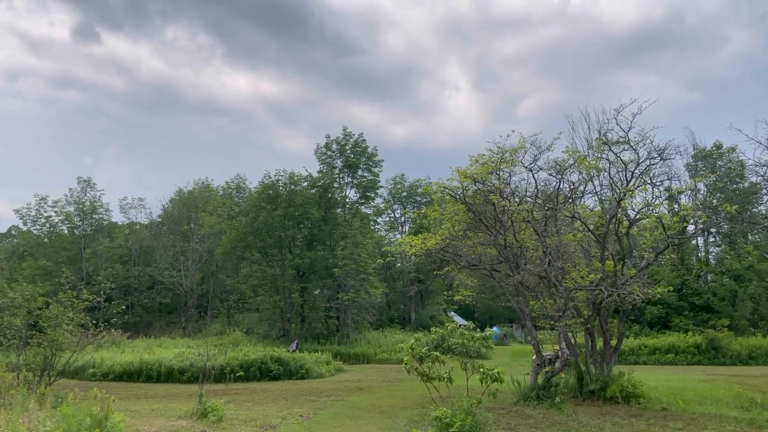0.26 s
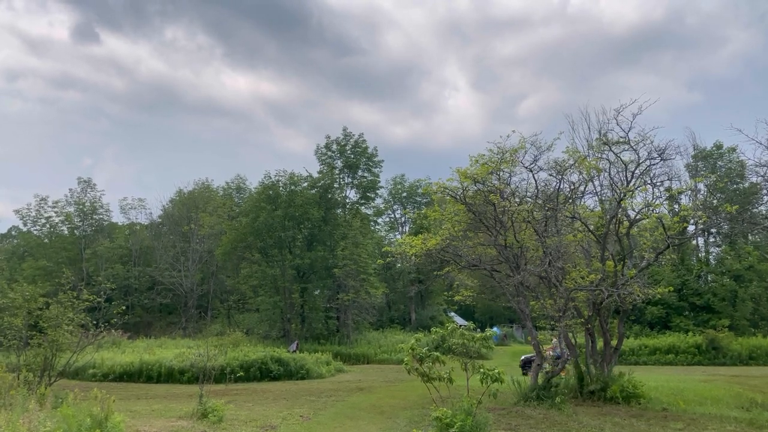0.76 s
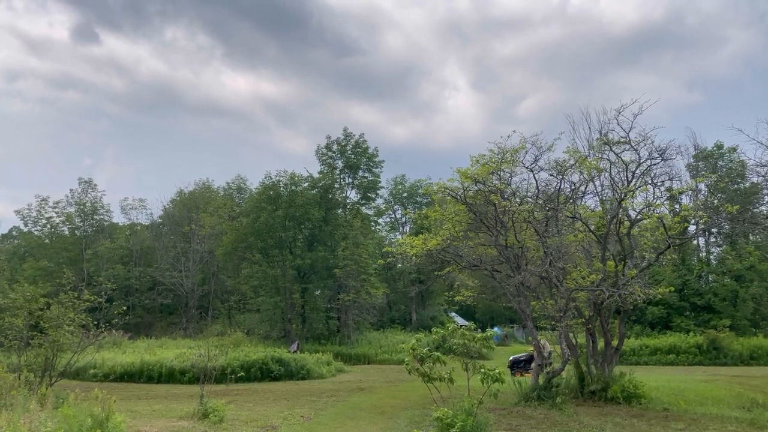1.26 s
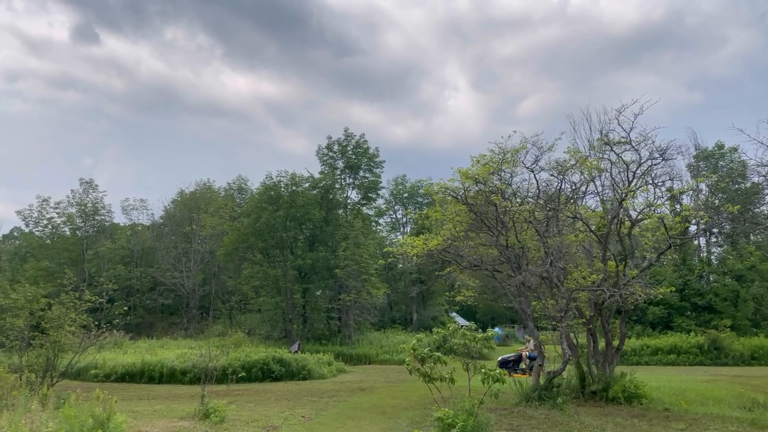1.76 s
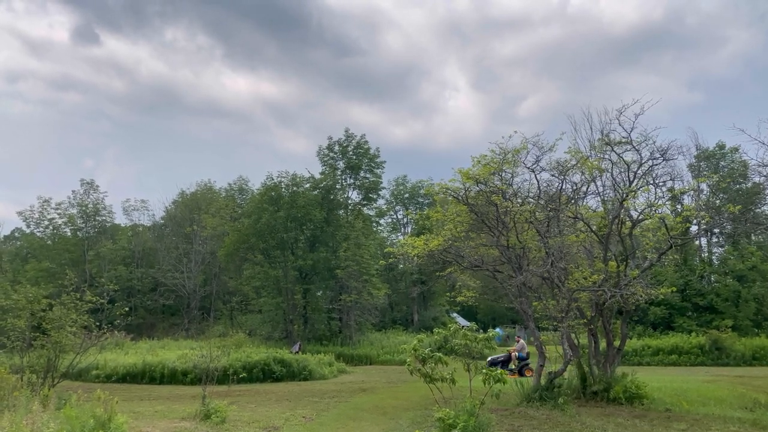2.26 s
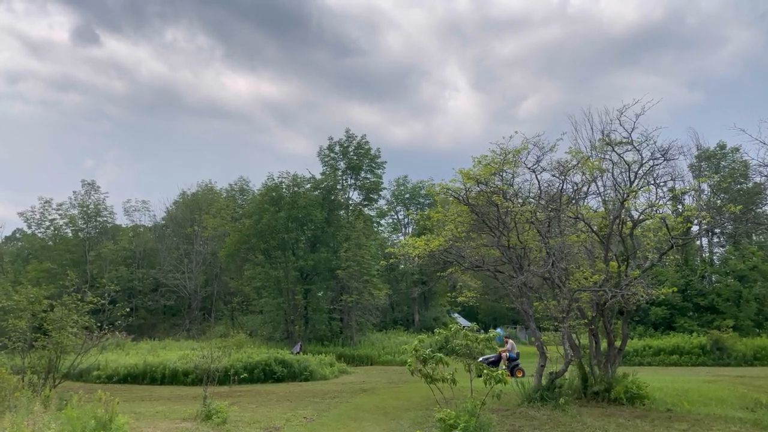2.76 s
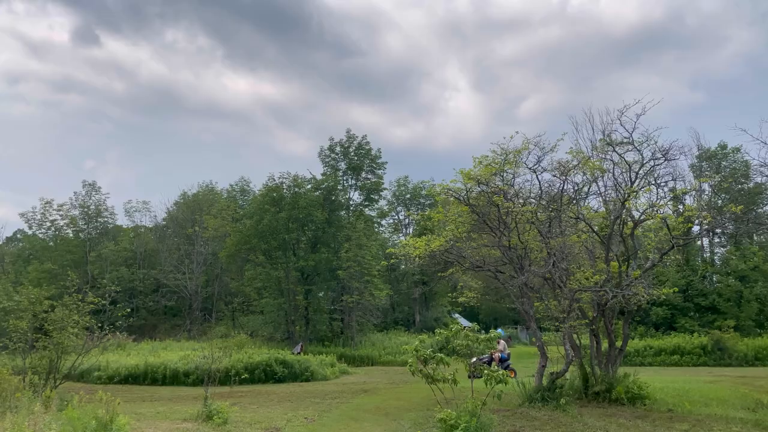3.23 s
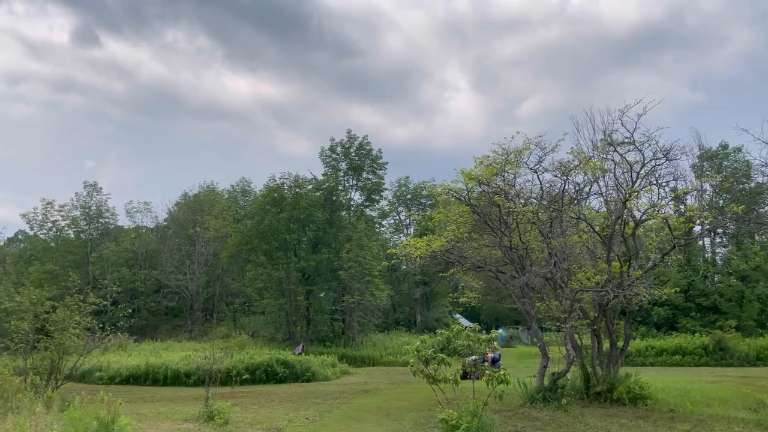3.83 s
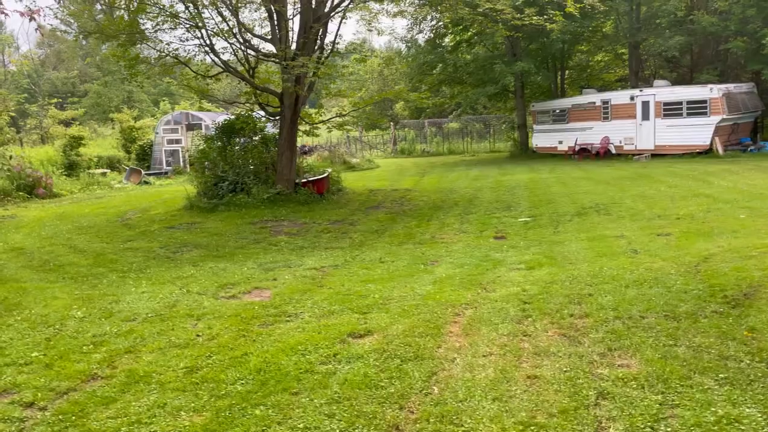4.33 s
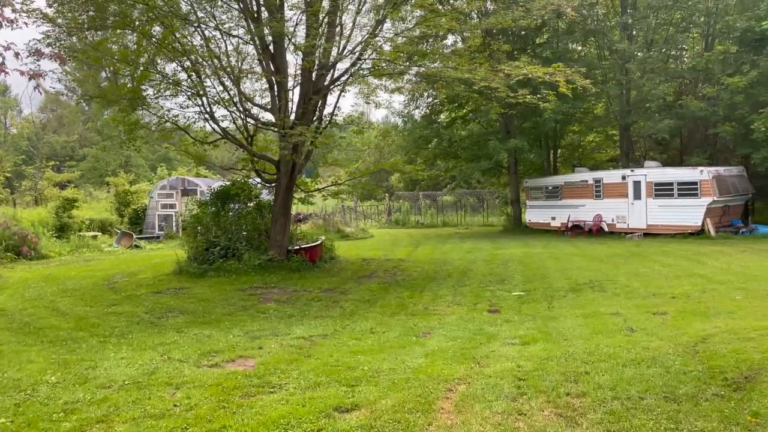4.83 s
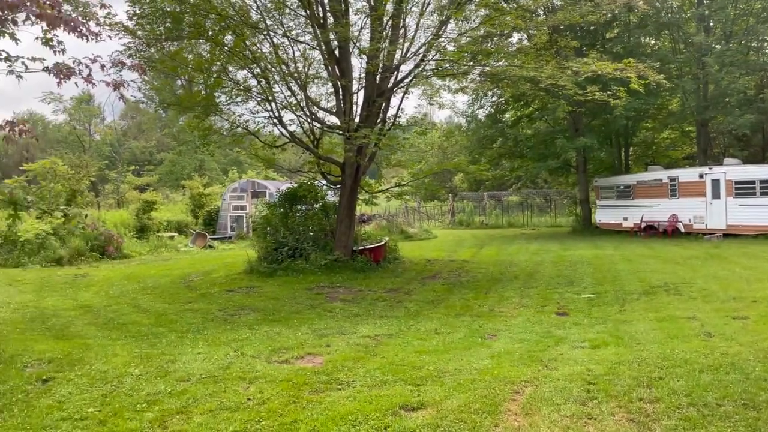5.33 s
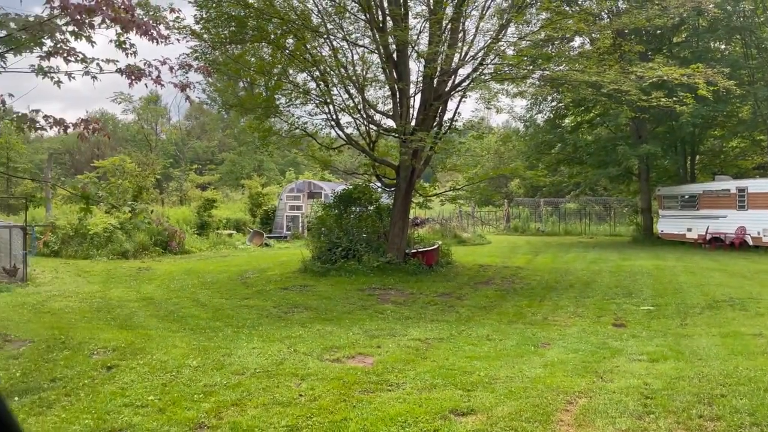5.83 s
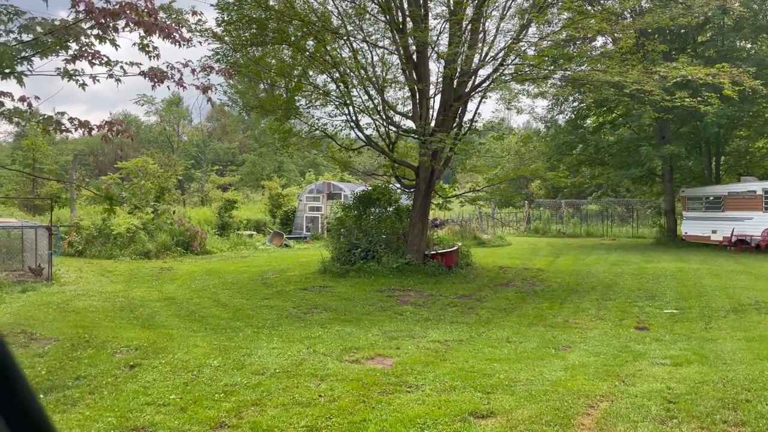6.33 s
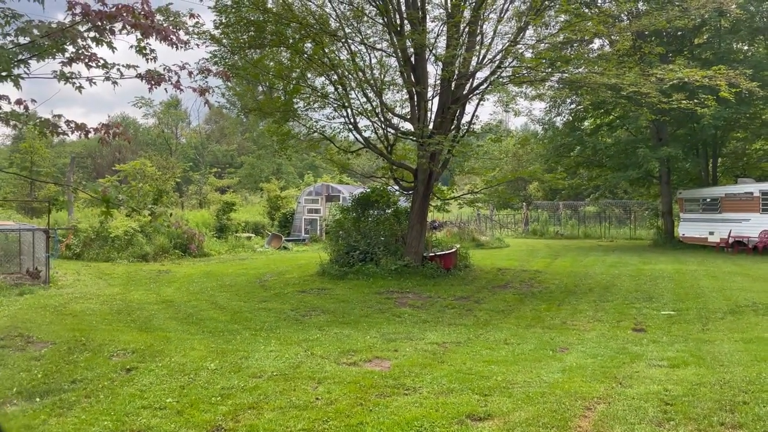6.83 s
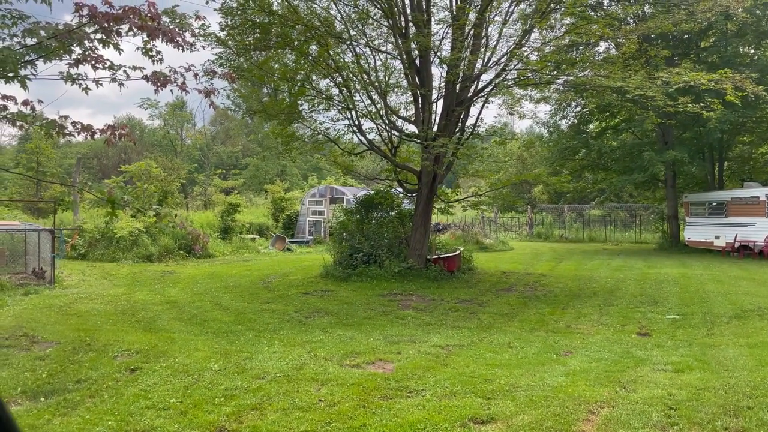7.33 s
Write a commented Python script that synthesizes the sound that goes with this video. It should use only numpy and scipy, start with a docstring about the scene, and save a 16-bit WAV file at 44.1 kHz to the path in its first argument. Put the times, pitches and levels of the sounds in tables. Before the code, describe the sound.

A mower's constant buzzing drone fills an open lawn, gradually clearer and brighter as it approaches, with brief crackles of struck debris. A hard cut leaves a much quieter yard, with only a muffled, throbbing low engine behind trees and faint open air. Quick high birdsong comes first with soft knocks and scuffs near the stereo microphone, then a lull, then thin chirps and a few faint ticks.

```python
"""A far lawn, then a sheltered yard: a riding mower approaches, and at 4.288 s the scene jumps to the yard.
Lawn: harmonics make the exhaust drone and blade hum, shaped noise the deck roar and struck twigs,
gliding narrow noise bands the whirring steel, ringing grit the pings.
Yard: low harmonics and noise make the mower's rumble, noise the open air, gliding whistles with tree echoes
the birds, short pulses and noise the soft taps, scuffs and ticks close by."""
import sys
import numpy as np
from scipy import signal
from scipy.fft import rfft, irfft
from scipy.io import wavfile

SR = 44100
rng = np.random.default_rng(int(sys.argv[2]) if len(sys.argv) > 2 else 0)


def dump(signal):
    """Clip the signal to [-1, 1] and save it as 16-bit WAV at the path in sys.argv[1]."""
    limited = np.clip(np.atleast_2d(signal).T, -1, 1)
    pcm = np.round(limited * 32767).astype(np.int16)
    wavfile.write(sys.argv[1], SR, pcm)


N = 334719
T, HZ = np.arange(N) / SR, np.fft.rfftfreq(N, 1 / SR)

# engine speed: t/s, rate/(four-stroke cycles/s)
SPEED = [(0, 25.5), (2.0, 25.5), (2.8, 25.42), (3.6, 25.22), (4.3, 25.25), (5.2, 25.6), (6.5, 25.72),
         (7.6, 25.5)]
# exhaust harmonics: multiple of the cycle rate, lawn level/dB, yard level/dB
EXHAUST = [(2, -35, -36.5), (3, -50, -59), (4, -40, -49), (5, -28.5, -40.5), (6, -34.5, -38.5),
           (7, -51, -52), (8, -41.5, -50.5), (9, -44.5, -66.5), (10, -43.5, -63.5), (12, -53, -90),
           (13, -48, -78), (14, -49.5, -75), (16, -61.5, -85)]
# likeness of the two microphone ports on the lawn: f/Hz, likeness 0-1
LAWN_LIKENESS = [(200, .99), (450, .95), (1000, .88), (2200, .66), (4200, .84), (5400, .62), (6200, .82),
                 (6900, .6), (7700, .96), (8700, .99), (9500, .88), (11000, .78), (13200, .99)]
# port balance on the lawn: f/Hz, left minus right/dB
LAWN_BALANCE = [(100, 7), (500, 2.5), (1500, 3), (2400, -0.5), (3300, 4.5), (4500, 0.5), (5500, -3),
                (7000, 0)]
# likeness of the ports in the yard: f/Hz, likeness 0-1
YARD_LIKENESS = [(200, 0.72), (500, 0.12), (1500, 0.073), (3000, 0.36), (7000, 0.15), (9000, 1),
                 (11200, 0.59), (12800, .99)]
# port balance in the yard: f/Hz, left minus right/dB
YARD_BALANCE = [(100, -8), (250, 3.5), (500, 2), (1200, 7), (2000, 3), (6500, 5), (8000, -0.5)]


def gain_of(db):
    """Decibels to amplitude."""
    return 10 ** (np.asarray(db) / 20)


def evened(x):
    """Scaled to rms 1."""
    return x / np.sqrt(np.mean(x ** 2) + 1e-20)


def over_time(rows):
    """Each column of a curve table at every sample."""
    s, *columns = np.transpose(rows)
    return [np.interp(T, s, c) for c in columns]


def over_hz(points):
    """A short spectrum at every frequency, interpolated over log f."""
    f, value = np.transpose(points)
    return np.interp(np.log(HZ + 1), np.log(f + 1), value)


def shaped(x, gain):
    """Filters by a gain at every frequency."""
    return irfft(rfft(x) * gain, N)


def add(mix, s, sound):
    """Lays a sound into the mix at a time in s."""
    part = mix[round(s * SR):][:len(sound)]
    part += sound[:len(part)]


def drift(rate_hz):
    """Gaussian-spectrum random motion of rms 1, mostly below rate_hz."""
    hz = HZ[:len(HZ) // 10]
    real, imaginary = rng.standard_normal((2, len(hz)))
    return evened(irfft((real + 1j * imaginary) * np.exp(-(hz / rate_hz) ** 2) * (hz > 0), N))


def swells(rows, width_s):
    """Smooth passing changes of level, in dB."""
    return sum(db * np.exp(-((T - s) / width_s) ** 2) for s, db in rows)


def ports(direct, diffuse, likeness, balance):
    """Two ports hear one sound with a phase between them, the right also an unrelated share."""
    # f/Hz, left lead/rad
    port_phase = [(0, 0), (2300, 0), (2800, 1.4), (3400, -1.2), (3800, 0), (4900, .2), (5600, -2.0),
                  (6600, -.9), (7200, -2.95), (8700, -3.2), (9300, -3.4), (10000, -3.9), (11500, -4.9),
                  (13100, -6.28)]
    same = np.clip(over_hz(likeness), 0, 1)
    tilt = gain_of(over_hz(balance) / 2)
    shared = shaped(direct, same * np.exp(-1j * over_hz(port_phase)) / tilt)
    unrelated = shaped(diffuse, np.sqrt(1 - same ** 2) / tilt)
    return np.array([shaped(direct, tilt), shared + unrelated])


def turbulence(db, band_hz, likeness, balance, knock=0):
    """Stereo noise of a given spectrum, mid channel at rms 1 within a band; knock joins the noise."""
    direct, diffuse = rng.standard_normal((2, N))
    noise = shaped(np.array([evened(direct + knock), diffuse]), gain_of(db))
    x = ports(*noise, likeness, balance)
    return x / np.std(shaped(x.mean(0), (HZ > band_hz[0]) & (HZ < band_hz[1])))


def tone(turns, multiple, scatter, lag_rad=0):
    """One harmonic at rms 1, with a share that fades in and out through moving air and trees."""
    path = 1 + scatter * (drift(5.7) + 1j * drift(4.8))
    return evened((path * np.exp(1j * (2 * np.pi * multiple * turns - lag_rad))).imag)


def trees(x, t60_s, delay_s):
    """Trunks and leaves scatter a sound into a sparse decaying tail, different at each port."""
    t = T[:SR]
    sparse = rng.standard_normal((2, SR)) * (rng.random((2, SR)) < .05)
    tail = sparse * gain_of(-60 * t / t60_s) * (1 - np.exp(-t / delay_s))
    return signal.fftconvolve(x[None], tail / np.linalg.norm(tail[0]), axes=1)[:, :N]


def air(level_db=-60, swell_db=-0.2, leaves_db=1.5):
    """The faint noise wash of open air, with leaves stirring unevenly in the treble."""
    # f/Hz, density/dB
    air_spectrum = [(100, 16.5), (500, 1), (1000, 0.5), (2000, -2.5), (4000, -8.5), (6000, -15),
                    (8000, -17.5), (10000, -27), (14000, -25.5), (15500, -37)]
    wash = turbulence(over_hz(air_spectrum), (500, 3000), YARD_LIKENESS, YARD_BALANCE)
    leaves = shaped(wash, HZ ** 2 / (HZ ** 2 + 6000 ** 2))
    wash = wash + leaves * (gain_of(leaves_db * drift(32)) - 1)
    return wash * gain_of(level_db + swell_db * drift(7.2))


def far_calls(quaver=0.023, tree_db=7.5):
    """A distant bird's level whistles, heard only through scattering trees."""
    # t/s, length/s, f/Hz, level/dB ahead of the tree gain
    notes = [(6.06, 0.06, 1950, -64), (6.37, 0.04, 3000, -66), (6.78, 0.11, 2310, -66),
             (6.89, 0.08, 1950, -64), (7.168, 0.045, 1900, -62)]
    song, waver = np.zeros(N), 1 + quaver * drift(80)
    for s, length_s, hz, db in notes:
        size = round(length_s * SR)
        whistle = np.sin(2 * np.pi * np.cumsum(hz * waver[:size]) / SR)
        add(song, s, gain_of(db) * whistle * np.hanning(size))
    return gain_of(tree_db) * trees(song, t60_s=0.14, delay_s=0.003)


def twitter(start_s=4.8, end_s=5.6, low_hz=2700, high_hz=4400, level_db=-61, count=60):
    """A faint blurred twitter of random rising or falling slurs, heard only through the trees."""
    song, u = np.zeros(N), np.linspace(-.5, .5, SR // 30)
    for when, pitch, slur in rng.random((count, 3)):
        hz = (low_hz + pitch * (high_hz - low_hz)) * (1 + 0.354 * np.sign(slur - .5) * u)
        whistle = np.sin(2 * np.pi * np.cumsum(hz) / SR) * np.hanning(len(u))
        add(song, start_s + when * (end_s - start_s), gain_of(level_db) * whistle)
    return trees(song, t60_s=0.19, delay_s=0.0086) * gain_of([[2], [-2]])


def birds(direct_db=-4.0, near_db=2, far_db=-9, buzz=.045, quaver=0.0044):
    """Each syllable is a whistle gliding through its pitches, blurred by near branches and the far tree line."""
    # name: length/s, roughness 0-1, echo/dB, glide pitches/Hz
    repertoire = { "slur": (0.04, 0.1, -1.5, [4570, 4490, 4270, 3930, 3550]),
                  "rise": (0.04, 0.25, 0, [4200, 4700, 4950, 5150]),
                  "peak": (0.064, 0.12, -1, [3740, 3900, 4190, 4740, 5330, 4320, 3870, 3650]),
                  "hold": (0.044, 0.16, 0, [5120, 5290, 5240, 5180]),
                  "murmur": (0.07, 1, -1, [3500, 3720, 3850]),
                  "drop": (0.045, 1.0, 2, [3500, 3050, 2750, 2500]),
                  "buzz": (0.046, 0.9, -2, [6000, 6700, 7300]), "peep": (0.028, 0.1, -2, [1460, 1400]),
                  "pip": (0.055, 0.03, -4, [5330, 5220, 5130, 5060, 5100]),
                  "whistle": (0.05, 0.04, -7, [5260, 5170, 5170, 5130]),
                  "slide": (0.078, 0.26, 0, [7600, 6700, 6050, 6040]),
                  "chip": (0.026, 0.05, -5, [3560, 3600, 3540]),
                  "tsip": (0.042, 0.1, -9, [7440, 7460, 7230, 7450]),
                  "zip": (0.046, 0.9, -2, [7300, 7700, 8400]),
                  "arch": (0.115, 0.42, -1, [3600, 3950, 4330, 5450, 5650, 5150, 4850])}
    # warbled song, then thin high calls: t/s, syllable, level/dB
    phrases = [(4.368, "slur", -55), (4.425, "rise", -60), (4.452, "hold", -60), (4.513, "slur", -49),
               (4.606, "peak", -50), (4.652, "hold", -64), (4.674, "drop", -56), (4.671, "peep", -53),
               (4.762, "peep", -46), (4.81, "murmur", -58), (4.863, "slur", -50), (4.918, "rise", -53),
               (4.944, "hold", -55), (5.004, "slur", -47.5), (5.066, "buzz", -58), (5.091, "peak", -48.5),
               (5.135, "hold", -63), (5.175, "drop", -57.5), (5.295, "murmur", -58.5),
               (5.358, "slur", -52.5), (5.408, "rise", -55), (5.44, "hold", -58), (5.496, "slur", -52),
               (5.59, "peak", -54.5), (5.655, "drop", -58), (5.79, "zip", -65), (6.733, "whistle", -54),
               (6.818, "slide", -61), (6.978, "slur", -60), (7.03, "pip", -51.5), (7.106, "slide", -58.5),
               (7.258, "tsip", -56.5), (7.303, "chip", -57), (7.365, "arch", -54.5), (7.564, "tsip", -59)]
    song, thrown, flutter = np.zeros(N), np.zeros(N), drift(500)
    for s, name, db in phrases:
        length_s, rough, echo_db, pitches_hz = repertoire[name]
        u = np.linspace(0, 1, round(length_s * SR))
        hz = np.interp(u, np.linspace(0, 1, len(pitches_hz)), pitches_hz)
        hz = hz * (1 + (quaver + buzz * rough) * np.roll(flutter, -round(s * SR))[:len(u)])
        whistle = gain_of(db) * np.sin(2 * np.pi * np.cumsum(hz) / SR) * signal.windows.tukey(len(u), .7)
        add(song, s, whistle)
        add(thrown, s, gain_of(echo_db) * whistle)
    # twigs and leaves throw back the high notes best
    scattered = shaped(thrown, HZ ** 2 / (HZ ** 2 + 2000 ** 2))
    near = gain_of(near_db) * trees(scattered, t60_s=0.45, delay_s=0.0031)
    far = gain_of(far_db) * trees(scattered, t60_s=0.8, delay_s=.04)
    return (gain_of(direct_db) * song + near + far) * gain_of([[2.6], [-2.6]])


def taps(lag_cycles=1.5, level_db=-1, echo_db=-12, ring_hz=1560, ring_t60_s=0.032,
         snap_hz=1700, snap_delay_s=0.0006):
    """Sharp snap, dull push whose bass arrives last, a little ring and short echo; soft scuffs lie between."""
    # t/s, level/dB ahead of level_db, ring/dB and snap/dB against the push
    tap_rows = [(4.451, -40.5, -22, 2), (4.481, -48, -28, -12), (4.515, -42, -25, -14),
                (4.617, -42, -28, -18), (4.944, -41, 2.5, 0), (4.997, -43.5, -30, -16),
                (6.563, -56, -26, -12), (6.977, -46, -28, -18)]
    # t/s, length/s, level/dB
    scuff_rows = [(4.467, 0.045, -49.5), (4.563, 0.041, -53), (4.882, 0.07, -53)]
    # taps and scuffs: f/Hz, density/dB
    push_spectrum = [(60, -23), (200, 1), (400, 3.5), (750, -6), (1400, -11), (2500, -22), (6000, -42),
                     (12000, -58)]
    blows, scuffs, t = np.zeros(N), np.zeros(N), T[:SR // 20]
    colour = gain_of(over_hz(push_spectrum))
    push = irfft(colour * np.exp(-2j * np.pi * lag_cycles * np.log(HZ + 1)), N)[:len(t)]
    push = push / abs(push).max()
    ring = gain_of(-60 * t / ring_t60_s) * np.sin(2 * np.pi * ring_hz * t)
    u = 2 * np.pi * snap_hz * np.maximum(t - snap_delay_s, 0)
    snap = u * (2 - u) * np.exp(-u)
    snap = snap / snap.max()
    for s, db, ring_db, snap_db in tap_rows:
        blow = push + gain_of(ring_db) * ring + gain_of(snap_db) * snap
        add(blows, s, gain_of(db + level_db) * blow)
    for s, length_s, db in scuff_rows:
        add(scuffs, s, gain_of(db) * np.hanning(round(length_s * SR)))
    rubbing = scuffs * evened(shaped(rng.standard_normal(N), colour))
    return blows + rubbing + gain_of(echo_db) * trees(blows, t60_s=0.074, delay_s=0.0023)


def snaps(rows, level_db, rise_s, t60_s, crackle_db):
    """Short bright noise bursts whose level crackles irregularly."""
    # f/Hz, density/dB
    snap_spectrum = [(500, -27), (2000, -23), (4500, 2.5), (7000, 2.5), (9000, 2.5), (13000, 1),
                     (15500, -11)]
    strikes, t = np.zeros(N), T[:SR // 4]
    for s, db in rows:
        add(strikes, s, gain_of(db + level_db - 60 * t / t60_s) * (1 - np.exp(-t / rise_s)))
    splinters = evened(gain_of(crackle_db * drift(700)))
    noise = turbulence(over_hz(snap_spectrum), (7000, 15000), LAWN_LIKENESS, LAWN_BALANCE)
    return strikes * splinters * noise


def ticks():
    """Faint crisp ticks in the yard, as short noise bursts."""
    # t/s, level/dB ahead of level_db
    tick_rows = [(4.45, -57), (4.5126, -61), (5.0399, -61), (5.6543, -58), (6.0748, -57), (6.7198, -57),
                 (6.7752, -70), (6.9294, -60), (7.1718, -58)]
    return snaps(tick_rows, level_db=-10, rise_s=.001, t60_s=0.12, crackle_db=3.0)


def far_mower(cycles, right_lead_s=0.0005, octave_db=-50, throb_db=1.5, roar_db=-67, rumble_db=-51):
    """Mostly bass bends round into the yard, from the right, much of it scattered into a throbbing rumble."""
    # exhaust fades: t/s, multiples 2-3/dB, 4-5/dB, above/dB
    shelter = [(4.35, -6, 0, -10), (4.55, -8, -6, -13), (4.8, -7, -4, -10), (5.05, -14, -7, -4.5),
               (5.18, -2, -4, -5.5), (5.5, -2, -14, -3.5), (5.8, 0, -1, -5.5), (6.35, -1, -4, -2.5),
               (6.8, -1, 4, -3), (7.0, -1.5, 0.5, -3.5), (7.6, -2.5, -1.5, -2.5)]
    # blade hum throbs and dies away: t/s, level/dB ahead of a 2 dB cut
    yard_hum = [(4.3, -39), (4.52, -31), (4.62, -37), (4.73, -32), (4.85, -37.5), (4.95, -41),
                (5.03, -33.5), (5.16, -34), (5.42, -31.5), (5.56, -33), (5.7, -38), (5.92, -32),
                (6.08, -37.5), (6.19, -32.5), (6.45, -40), (7.0, -52)]
    # f/Hz, density/dB
    rumble_spectrum = [(20, -30), (32, -17), (50, -3), (80, -4.5), (108, 2), (150, -2.5), (200, -10.5),
                       (280, -14.5), (350, -23.5), (450, -33), (800, -74)]
    # rumble swells: t/s, rise/dB
    swell_rows = [(4.48, 2.5), (4.95, 4), (5.3, 1.5), (5.55, 8), (5.92, -0.5), (6.3, 3.5), (6.8, -3),
                  (7.14, 1), (7.6, 8)]
    # faint deck roar: f/Hz, density/dB
    far_roar = [(100, -9), (300, -1), (700, 4), (1300, -7), (2200, -21), (4000, -42)]
    lowest, fifth, upper = gain_of(over_time(shelter))
    harmonics = exhaust(cycles, column=2, scatter=0.07)
    tones = sum(h * (lowest if row[0] < 4 else fifth if row[0] < 6 else upper)
                for row, h in zip(EXHAUST, harmonics))
    turns = 3.672 * cycles  # belt slips a little more than on the lawn
    tones += gain_of(over_time(yard_hum)[0] - 2.0) * tone(turns, 0.99, scatter=0.12)
    tones += gain_of(octave_db) * tone(turns, 2, scatter=0.29)
    rumble = turbulence(over_hz(rumble_spectrum), (160, 350), YARD_LIKENESS, YARD_BALANCE)
    rumble = rumble * gain_of(rumble_db + swells(swell_rows, width_s=0.11) + throb_db * drift(14))
    roar = gain_of(roar_db) * evened(shaped(rng.standard_normal(N), gain_of(over_hz(far_roar))))
    left, right = (tones + roar) * gain_of([[-0.8], [0.8]]) + rumble
    return np.array([left, shaped(right, np.exp(2j * np.pi * HZ * right_lead_s))])


def twigs():
    """Twigs and grit struck by the blades, as splintering noise bursts."""
    # t/s, level/dB ahead of level_db
    twig_rows = [(0.8202, -42), (0.992, -45), (1.8371, -45), (2.0138, -40), (2.562, -33), (3.1756, -45),
                 (3.7278, -44)]
    return snaps(twig_rows, level_db=2.0, rise_s=0.0014, t60_s=0.058, crackle_db=-4.0)


def pings(half_width_hz=260, t60_s=0.06):
    """Grit pings off the blades: a short ring of steel, a noise band round one pitch."""
    # t/s, f/Hz, level/dB
    ping_rows = [(0.992, 10500, -38)]
    out, t = np.zeros(N), T[:SR // 8]
    grit = (drift(half_width_hz) + 1j * drift(half_width_hz))[:len(t)]
    for s, hz, db in ping_rows:
        ring = (grit * np.exp(2j * np.pi * hz * t)).real
        add(out, s, gain_of(db - 60 * t / t60_s) * ring * (1 - np.exp(-t / .001)))
    return ports(out, out, LAWN_LIKENESS, LAWN_BALANCE)


def whirs(cycles, half_width_hz=100, waver_db=2.0, throb=0.081, level_db=-2.0):
    """Deck resonances: narrow bands of ringing steel that glide as the mower turns and pulse with the engine."""
    # one curve per resonance: t/s, centre f/Hz, level/dB ahead of level_db
    whir_curves = [
        [(0, 1870, -50), (0.8, 1878, -46), (1.6, 1822, -50.5), (2.3, 1846, -52.5), (3.0, 1930, -46),
         (3.8, 1973, -46), (4.29, 1956, -48)],
        [(0, 2330, -53), (0.7, 2363, -49.5), (1.1, 2580, -51.5), (1.8, 2594, -53), (2.03, 2560, -43.5),
         (2.2, 2580, -55), (2.45, 2550, -47), (2.65, 2544, -48), (2.86, 2570, -44.5), (3.2, 2512, -49),
         (4.29, 2458, -51)],
        [(0, 3920, -55), (0.8, 3924, -50), (1.5, 3940, -61), (2.03, 3910, -49), (2.5, 4000, -49),
         (3.2, 3930, -53), (4.29, 3950, -51)],
    ]
    direct, diffuse = np.zeros((2, N))
    for curve in whir_curves:
        hz, db = over_time(curve)
        turn = np.exp(2j * np.pi * np.cumsum(hz) / SR)
        size = gain_of(db + level_db + waver_db * drift(11)) * (1 + throb * np.cos(6 * np.pi * cycles))
        for port in (direct, diffuse):
            port += size * (turn * (drift(half_width_hz) + 1j * drift(half_width_hz))).real
    return ports(direct, diffuse, LAWN_LIKENESS, LAWN_BALANCE)


def deck_levels(start_db=-37.5, approach_db_per_s=1.04, hiss_db=-41.5, shade_db=-5.5,
                clear_s=1.74, clearing_s=0.33):
    """Reference roar and hiss/dB as the mower nears, clears a tree's shade and surges in thick tufts."""
    # t/s, rise/dB
    tufts = [(0.83, 2), (2.03, 4.5), (2.57, 1), (2.91, 1.5)]
    load_db = swells(tufts, width_s=0.036)
    hidden = (1 - np.tanh((T - clear_s) / (2 * clearing_s))) / 2
    return start_db + approach_db_per_s * T + load_db, hiss_db + shade_db * hidden + load_db / 2


def deck(cycles, blade_throb=0.033, valve_throb=0.08, flutter_db=0.84, ripple_db=3.0, knock_share=0.27):
    """Air and grass whirl in the steel deck; the roar beats with the blades, the hiss with the engine."""
    # f/Hz, density/dB
    roar_spectrum = [(25, -28), (40, -16), (58, -13), (150, -4.5), (370, -6), (600, -10), (900, -12),
                     (1400, -16), (2500, -14.5), (5000, -18.5), (7000, -21.5), (10000, -24), (13300, -28),
                     (15700, -34.5)]
    # deck ringing and ground-echo notches: f/Hz, half width/Hz, change/dB
    deck_colour = [(598, 26, -12), (840, 30, 0.5), (906, 46, 2.5), (1320, 56, -2.5), (1860, 85, 1),
                   (2185, 38, -10.5), (2810, 63, -6), (3050, 30, -6), (3180, 36, -2.5), (4390, 100, 2),
                   (4900, 230, 2.5), (5760, 110, -4.5), (6000, 87, 7.5), (6400, 66, 2.5), (11200, 150, 4),
                   (13160, 330, 7.5)]
    colour = over_hz(roar_spectrum)
    colour = colour + sum(db / (1 + ((HZ - hz) / width_hz) ** 2) for hz, width_hz, db in deck_colour)
    # crowded sheet-metal modes ripple the spectrum above the bass
    colour = colour + ripple_db * drift(78)[:len(HZ)] * HZ / (HZ + 600)
    # valves and piston make the same irregular knocking in every cycle
    one_cycle = rng.standard_normal(round(SR / SPEED[0][1]))
    knock = knock_share * one_cycle[(cycles % 1 * len(one_cycle)).astype(int)]
    treble = 1 / (1 + (1700 / (HZ + 1)) ** 4)
    low_db = colour + 10 * np.log10(1 - treble + 1e-12)
    high_db = colour + 10 * np.log10(treble)
    low = turbulence(low_db, (300, 1500), LAWN_LIKENESS, LAWN_BALANCE, knock)
    high = turbulence(high_db, (3000, 7000), LAWN_LIKENESS, LAWN_BALANCE, knock)
    roar_db, hiss_db = deck_levels()
    chop, clatter = np.cos(2 * np.pi * 3.702 * cycles), np.cos(6 * np.pi * cycles)
    roar = low * gain_of(roar_db - 3.5) * (1 + blade_throb * chop)
    hiss = high * gain_of(hiss_db - 1.1) * (1 + valve_throb * clatter)
    return (roar + hiss) * gain_of(flutter_db * drift(71))


def blades(cycles, passes_per_cycle=3.702, wander_turns=0.036):
    """The belt-driven blades chop the air: a hum with overtones that swell and fade, each in its own time."""
    # pass rate: t/s, level/dB
    hum_curve = [(0, -29.5), (0.85, -27), (1.45, -27.5), (1.85, -27.5), (2.7, -26), (3.1, -28),
                 (3.35, -28.5), (3.95, -34), (4.29, -32)]
    # multiples 2, 3, 4 of the pass rate: t/s, level/dB ahead of a 0.37 dB cut
    second = [(0, -28.5), (.2, -28), (.55, -31), (.8, -33.5), (.98, -38), (1.15, -33), (1.3, -41),
              (1.65, -38), (1.8, -31.5), (2.05, -31), (2.25, -32), (2.42, -38.5), (2.62, -30.5),
              (2.9, -31.5), (3.08, -31), (3.25, -41), (3.8, -40), (3.95, -36), (4.08, -34), (4.29, -39)]
    third = [(0, -32.5), (.25, -44), (.65, -45), (.82, -38.5), (1.0, -47.5), (1.13, -39), (1.27, -32.5),
             (1.47, -51), (1.66, -35), (1.95, -50), (2.35, -44), (2.5, -36), (2.76, -45), (2.95, -36),
             (3.099, -35), (3.23, -48), (3.45, -40.5), (3.751, -39.5), (4.05, -44), (4.26, -30)]
    fourth = [(0, -50), (.25, -42), (.65, -43), (.95, -42.5), (1.3, -47.5), (1.7, -54), (1.82, -40.5),
              (2.15, -50.5), (2.36, -38), (2.76, -48), (2.88, -32), (3.04, -45), (3.2, -33.5),
              (3.35, -40.5), (3.651, -39), (4.29, -37)]
    # multiple of the pass rate, start level against the roar reference/dB, further rise/(dB/s)
    high_tones = [(5, -15.5, 0.2), (6, -27.5, 2), (7, -17.5, 0.5), (8, -23.5, 0), (10, -20, -1.05)]
    roar_db, _ = deck_levels()
    turns = passes_per_cycle * cycles + wander_turns * drift(4.5)
    hum = gain_of(over_time(hum_curve)[0]) * tone(turns, 1, scatter=0.07)
    for k, curve in enumerate([second, third, fourth], 2):
        hum += gain_of(over_time(curve)[0] - 0.37) * tone(turns, k, scatter=0.23)
    for k, db, rise in high_tones:
        hum += gain_of(roar_db + db + rise * T) * tone(turns, round(k), scatter=1.0)
    return hum


def exhaust(cycles, column, scatter, spread_rad=2.26):
    """One puff per engine cycle, as a list of harmonics whose phases spread with the square of their
    multiple, softening the puff; the high ones waver most."""
    return [gain_of(row[column]) * tone(cycles, row[0], scatter * (row[0] / 5) ** 2, spread_rad * row[0] ** 2)
            for row in EXHAUST]


def scene(jump_s=4.288, fade_db=-15, fade_s=0.02):
    """The open lawn, then the sheltered yard, which fades in just after the jump."""
    # the governor hunts a little
    cycles = np.cumsum(over_time(SPEED)[0] * (1 + 0.0016 * drift(8))) / SR
    drone = sum(exhaust(cycles, column=1, scatter=0.035))
    lawn = drone + blades(cycles) + deck(cycles) + whirs(cycles) + pings() + twigs()
    yard = far_mower(cycles) + air() + birds() + twitter() + far_calls() + taps() + ticks()
    fade_in = gain_of(fade_db * np.exp(-np.maximum(T - jump_s, 0) / fade_s))
    return np.where(T < jump_s, lawn, yard * fade_in)


def record(dry):
    """The band limit of the recorder: a steep low-pass at 15750 Hz."""
    low_pass = signal.firwin(1023, 15750, window=("kaiser", 9), fs=SR)
    return signal.oaconvolve(dry, low_pass[None], "same")


dry = scene()
out = record(dry)
dump(out)
```